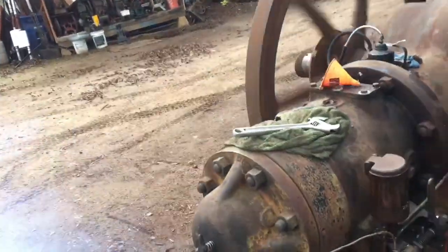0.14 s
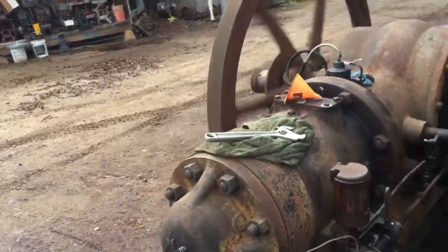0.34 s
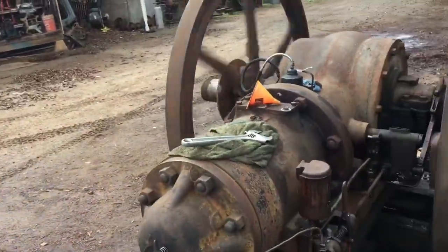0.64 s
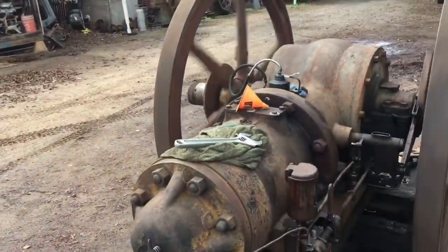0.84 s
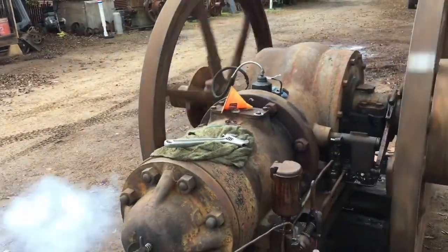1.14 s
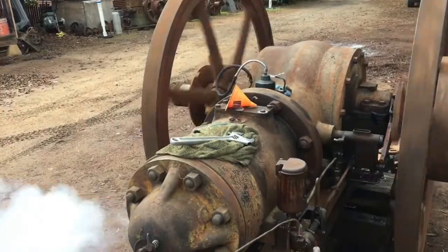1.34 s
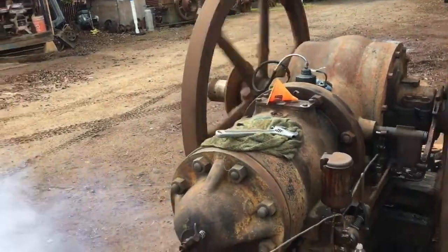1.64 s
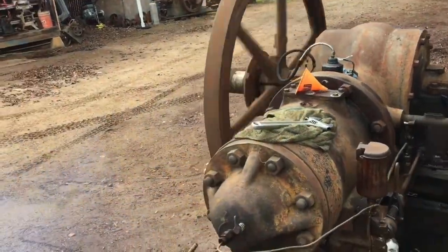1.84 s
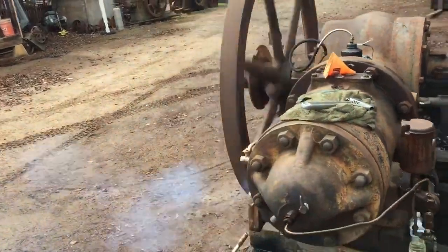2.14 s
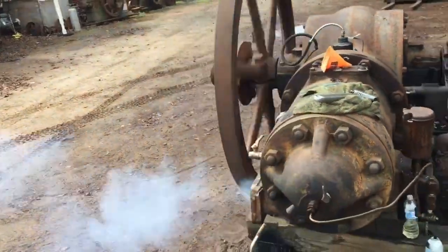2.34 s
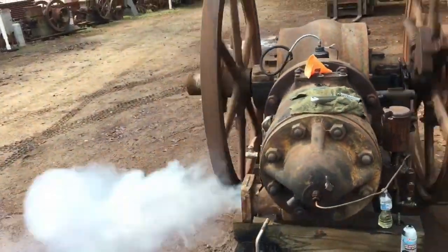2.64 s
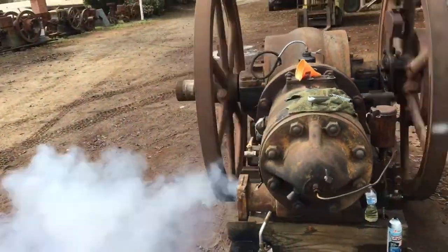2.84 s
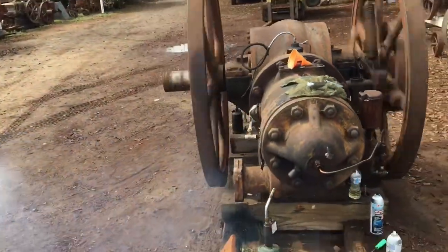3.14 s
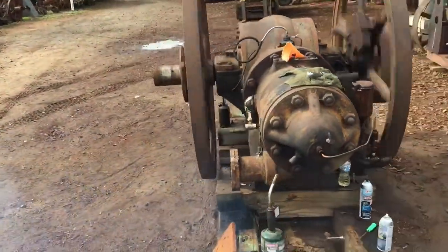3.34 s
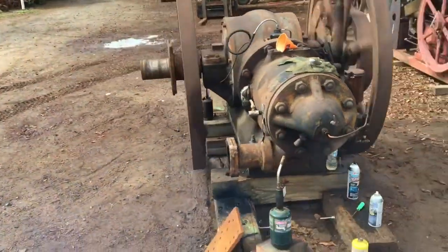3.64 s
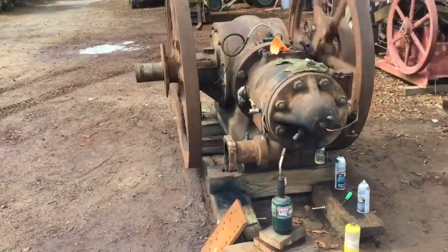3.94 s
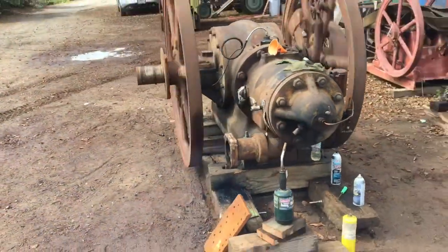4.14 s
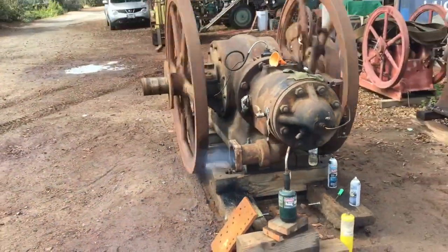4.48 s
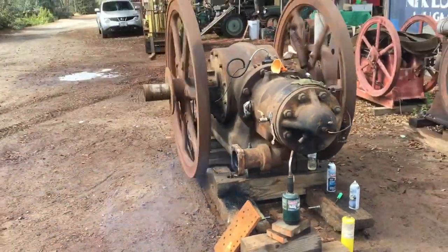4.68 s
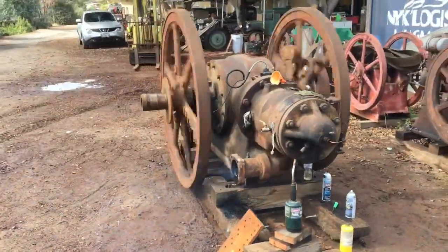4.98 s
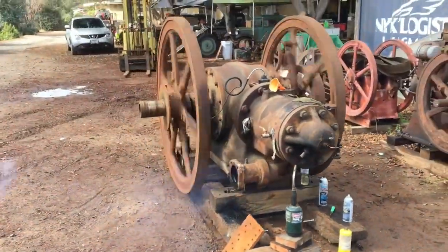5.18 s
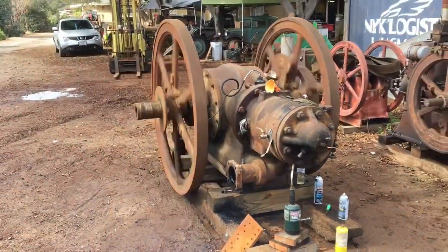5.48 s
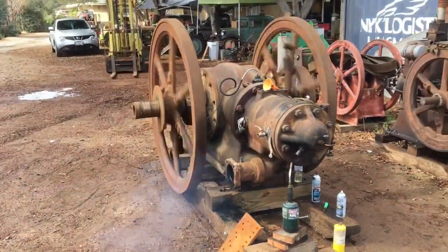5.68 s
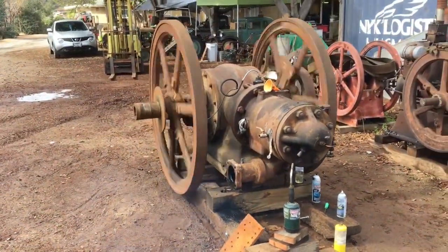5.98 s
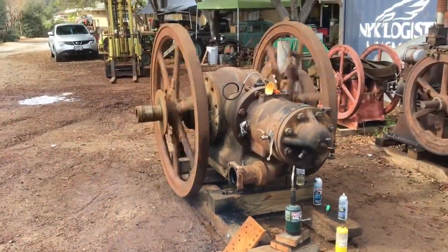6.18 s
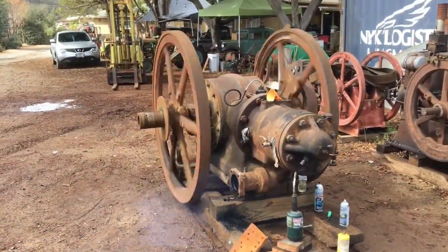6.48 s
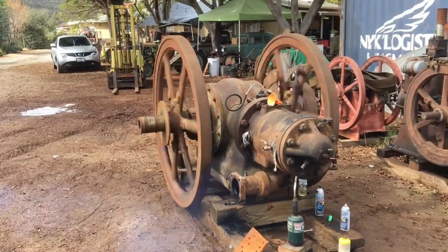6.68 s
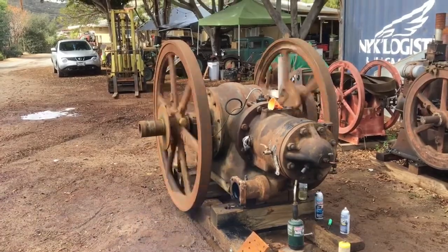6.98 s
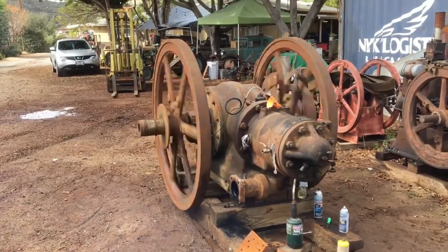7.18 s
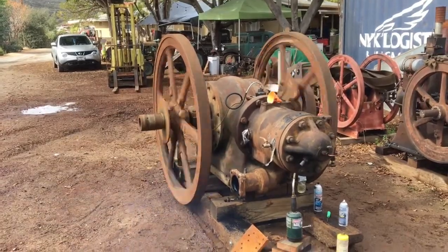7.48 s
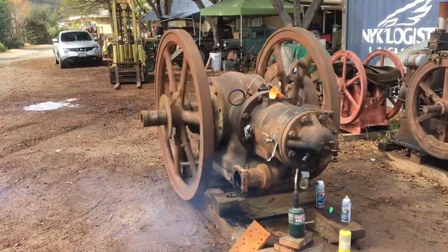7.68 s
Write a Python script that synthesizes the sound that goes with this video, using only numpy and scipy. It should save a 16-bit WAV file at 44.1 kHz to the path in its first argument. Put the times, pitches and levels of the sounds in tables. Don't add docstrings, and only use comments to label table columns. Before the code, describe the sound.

An old heavy flywheel engine runs unevenly in a dirt yard: punchy low thumps with hissing, cracking exhaust jets, then soft breathy misfires and occasional weak spits. Between blows the pipe hoots briefly and air rushes through the body. Small metal clinks and pump ticks sit underneath. The handheld microphone moves from close beside the engine to facing the exhaust, where the jets sound clearer and brighter; a short wall echo fades.

```python
import sys
import numpy as np
from scipy import signal
from scipy.io import wavfile

SR = 44100
rng = np.random.default_rng(int(sys.argv[2]) if len(sys.argv) > 2 else 0)


def inscribe(sig):
    pcm = np.round(np.clip(np.atleast_2d(sig).T, -1, 1) * 32767)
    wavfile.write(sys.argv[1], SR, pcm.astype(np.int16))


def how_loud(loudness_db):
    steps = np.asarray(loudness_db, float) / 20
    return 10 ** steps


N = 344862

# (time [s], thump [dB], jet [dB], pipe ring at shutting [Hz])
FIRED = [(0.011, -8.5, -24.5, 159), (0.1847, -9, -21.5, 149.6), (0.354, -9.5, -21, 151),
         (0.525, -9.5, -26, 146), (0.6953, -10.5, -26.5, 147), (1.3785, -10, -27.5, 140.6),
         (1.55, -7.5, -18.5, 158), (1.8914, -9.5, -23, 154), (2.9298, -6.5, -17, 151),
         (3.1043, -11, -20.5, 154.4), (3.2757, -11, -19.5, 156), (3.447, -12, -21, 159),
         (3.6185, -12, -21.5, 155), (3.7879, -11, -21, 154), (3.9567, -13, -24, 150),
         (4.2962, -11, -21.5, 146), (4.6354, -9.5, -19.5, 143), (4.8057, -12, -31.5, 145),
         (5.1446, -9, -19.5, 148), (5.3155, -11.5, -23.5, 146), (5.656, -8.5, -16.5, 148.5),
         (5.8244, -9.5, -19.5, 150), (5.9934, -10, -20, 150), (6.668, -8.5, -16.5, 153.5),
         (6.8361, -11, -19, 151), (7.004, -10.5, -19, 150), (7.1711, -10.5, -23, 143),
         (7.3369, -11.5, -20, 151.5), (7.668, -10, -19.5, 153.5)]
# (time [s], thump [dB], bark [dB], puff [dB], pipe ring [Hz])
MISSED = [(0.862, -21, -23.5, -52, 142.2), (1.031, -21.5, -27, -55, 135), (1.2057, -20.5, -38, -50, 134.3),
          (2.061, -20, -22, -52.5, 141), (2.233, -19.5, -20, -52, 137.5), (2.4062, -20, -43, -47.5, 132.7),
          (2.583, -20, -43, -46.5, 136.5), (4.1254, -22.5, -22.5, -51.5, 142),
          (4.466, -21.5, -24, -49, 138.5), (4.974, -19.5, -21, -45, 136), (5.4846, -20, -20, -45.5, 133.5),
          (6.3296, -21, -26, -47, 142), (6.497, -18, -20.5, -43.5, 135), (7.501, -23, -34, -48.5, 138)]
# (time [s], thump [dB], bark [dB], puff [dB], pipe ring [Hz])
HALF_BURNT = [
    (1.719, -18, -17, -53, 141),
    (2.754, -12.5, -11.5, -51.5, 130),
    (6.159, -15, -19, -46, 151.4),
]
# (time [s], share facing pipe end [0-1], share behind engine [0-1],
# running noise [dB], fuel pump [dB])
WALK = [(0, 0.15, 0.96, -54, -60), (.8, 0, 0.67, -71, -52.5), (1.3, 0.03, 0.89, -63, -51.5),
        (1.9, 0, 0.57, -60, -52.5), (2.7, 0.12, 0.68, -63, -46.5), (3.2, 0.31, 0, -51, -58),
        (4.2, 1, 0.13, -66, -61.5), (6, 1, 0.13, -59, -54.5), (7.82, 1, 0.3, -88, -61)]
# (time [s], level [dB])
SCAVENGE = [(0, 7.5), (.6, -2.1), (1.4, 5.9), (1.7, 0), (2.8, 5.5), (3.4, 6), (4.2, -0.8), (5.2, 3.1),
            (5.9, 0), (6.5, 3.7), (7.0, -2.2), (7.8, -4)]
# (time [s], level [dB])
INTAKE = [(1.9, -48), (1.958, -54), (2.194, -44.5), (2.534, -32), (2.784, -36.5), (2.904, -35), (3.0, -46)]
# (time [s], level [dB], pitch
# [Hz])
CLINKS = [(0.122, -31.5, 4200), (.298, -44, 4200), (1.488, -31.5, 2300), (1.5, -39, 4300),
          (1.988, -51, 11500), (1.899, -33, 1650), (2.25, -47, 1740), (7.1, -56, 2570), (7.29, -41, 4060),
          (.987, -55, 8600), (1.156, -59, 8560), (1.328, -59, 8700)]

# (centre [Hz], width [Hz], level [dB])
THROAT_SIDE = [(370.5, 58, 0.5), (488.4, 51, 0.5), (571, 420, -4), (897, 98, -5), (1059, 120, 0.5),
               (1290, 94, -28)]
THROAT_END = [(486.5, 45, 0), (669.5, 194, 4.5), (941, 92, 3), (1113, 280, -11.5)]
# (centre [Hz], width [Hz], level [dB])
MOUTH_SIDE = [(1200, 36, 13), (1775, 136, 4), (2526, 500, -2.5), (3834, 84, -6), (4200, 180, -13),
              (5550, 240, -12)]
MOUTH_END = [(1638, 150, 2), (2335, 380, 3), (3546, 1200, -4.5), (4100, 350, -2.5), (6840, 1200, -9)]
# (centre [Hz], width [Hz], level [dB])
PUMP = [(9300, 670, 0), (11500, 340, 5), (12000, 690, 3), (14400, 1100, -16)]
# (frequency [Hz], density [dB per Hz])
BLAST = [(710, -32), (1200, 3), (2020, -21.5), (2320, -7), (3080, -15.5), (3830, 7.5), (4500, -4.5),
         (6720, 5.5), (7660, -12), (9310, 0.5), (10600, -5.5), (14700, -1.5), (16000, -19)]
PUFF = [(710, -35), (1200, -4), (1810, 1.5), (2130, -5.5), (2380, -2), (2590, -1.5), (5020, -6.5),
        (5780, -8), (8000, -12.5), (11800, -8), (16000, -29)]
# (frequency [Hz], t60 [s])
BLAST_T60 = [(1200, 0.077), (3000, 0.14), (7000, 0.037), (15000, 0.042)]
YARD_T60 = [(1200, 1), (4000, 0.55), (15000, 0.076)]
# (frequency [Hz], level [dB], t60 [s])
FLAP = [(497, 10.5, 0.071), (969, 7.5, 0.052), (1076, 4, 0.063)]
IRON = [(1157, 6, 0.058), (1290, -14, 0.042), (1710, 1, 0.037), (2450, 4, 0.057), (2684, 2, 0.021),
        (3560, 2, 0.021), (4200, 2, 0.046), (5510, 0, 0.013), (7180, 0, 0.025)]
CLACK = [(479, -2, 0.075), (712.6, 3, 0.081), (972, 6, 0.03)]

# (at 145 Hz ring [dB], slope [dB per Hz of ring], after a miss [dB],
# from behind [dB], share of scavenge swing [dB per dB])
RING_RULE = (-23.5, -0.14, 1.5, -1.5, 0.54)
CLACK_RULE = (-33.5, -0.2, -2.6, 0.7, 0.74)
RETURN_RULE = (-41.5, -0.11, 1.5, 6, 0.7)
RETURN_JET_RULE = (-57, -0.2, -5, 11.5, 0.7)

OPEN_FIRED_S, OPEN_MISSED_S = 0.0628, 0.0638
BARK_DB, BARK_PER_THUMP = -11.5, 0.61
THROAT_DB, THROAT_PER_THUMP, THROAT_PER_JET = -19.5, 1.12, 0.37
MISS_THROAT_DB, HALF_THROAT_DB = -17.5, -19
BRIGHT_DB, BRIGHT_BEHIND_DB = -6, -4.5
ECHO_S, ECHO_DB, ECHO_BEHIND_DB, ECHO_BARK_DB = 0.046, -27, 17.5, -12
SWELL_BEHIND_S = 0.02
CRACK_DB, CRACK_T60_S, HALF_PUFF_DB = 5.5, 0.031, 5.5
IRON_PITCH_SPREAD = 0.043
BARK_HZ, BARK_SAG_HZ_PER_S = 169.3, 1320


def rms_one(x):
    return x / np.sqrt(np.mean(x ** 2) + 1e-20)


def at_hz(points, hz):
    table_hz, values = np.array(points).T
    return np.interp(np.log(hz), np.log(table_hz), values)


def at_s(rows, s, column):
    rows = np.array(rows)
    return np.interp(s, rows[:, 0], rows[:, column])


def add(out, s, wave):
    i = int(round(s * SR))
    wave = wave[max(-i, 0):max(N - i, 0)]
    out[max(i, 0):max(i, 0) + len(wave)] += wave


def gusts(times_s, levels_db, rise, hold, t60):
    u = np.arange(int((hold + t60) * SR)) / SR
    shape = (1 - np.exp(-(u / rise) ** 2)) * how_loud(-120 * np.maximum(u - hold, 0) / t60)
    out = np.zeros(N)
    for s, db in zip(times_s, levels_db):
        add(out, s, how_loud(2 * db) * shape)
    return out


def flutter(rate_hz, depth_db):
    r = np.exp(-2 * np.pi * rate_hz / SR)
    slow = signal.lfilter([1], [1, -2 * r, r * r], rng.standard_normal(N + 9000))[9000:]
    return how_loud(depth_db * rms_one(slow))


def resonant(modes, twice=False):
    white, out = rng.standard_normal(N), 0
    for k, (hz, width_hz, db) in enumerate(modes):
        r = np.exp(-np.pi * width_hz / SR)
        section = [1 - r, 0, r - 1, 1, -2 * r * np.cos(2 * np.pi * hz / SR), r * r]
        out = out + (-1) ** k * how_loud(db) * signal.sosfilt([section] * (1 + twice), white)
    return rms_one(out)


def facing_mix(facing, end, side):
    return np.sqrt(facing) * resonant(end, twice=True) + np.sqrt(1 - facing) * resonant(side, twice=True)


def strike(times_s, levels_db, modes, spread_db, spread_hz=0.006):
    out, u = np.zeros(N), np.arange(int(0.1 * SR)) / SR
    for s, db in zip(times_s, levels_db):
        for hz, mode_db, t60 in modes:
            hz = hz * (1 + spread_hz * rng.standard_normal())
            blow_db = db + mode_db + spread_db * rng.standard_normal()
            onset = 1 - np.exp(-u * hz / 5.2)
            add(out, s, how_loud(blow_db - 60 * u / t60) * np.sin(2 * np.pi * hz * u) * onset)
    return out


def openings():
    s, thump_db, jet_db, _ = np.transpose(FIRED)
    force_db = thump_db + 10.5
    bark_db = BARK_DB + BARK_PER_THUMP * force_db
    throat_db = THROAT_DB + THROAT_PER_THUMP * force_db + THROAT_PER_JET * (jet_db + 21)
    bright_db = BRIGHT_DB + BRIGHT_BEHIND_DB * at_s(WALK, s, column=2)
    fired = np.array([s, thump_db, bark_db, throat_db, jet_db, bright_db])
    s, thump_db, bark_db, puff_db, _ = np.transpose(MISSED + HALF_BURNT)
    rush_db = np.repeat([MISS_THROAT_DB, HALF_THROAT_DB], [len(MISSED), len(HALF_BURNT)])
    return fired, np.array([s, thump_db, bark_db, thump_db + rush_db, puff_db])


def shuttings():
    turns = [(r[0], r[-1], 0) for r in FIRED] + [(r[0], r[-1], 1) for r in MISSED + HALF_BURNT]
    s, hz, missed = np.transpose(sorted(turns))
    s = s + np.where(missed, OPEN_MISSED_S, OPEN_FIRED_S)
    behind, scavenge_db = at_s(WALK, s, column=2), at_s(SCAVENGE, s, column=1)
    causes = np.array([np.ones(len(s)), hz - 145, missed, behind, scavenge_db])
    rules = np.array([RING_RULE, CLACK_RULE, RETURN_RULE, RETURN_JET_RULE])
    ring_db, throat_db, return_db, jet_db = rules @ causes
    return np.array([s, ring_db, hz, throat_db, return_db, jet_db])


def rumble():
    shake = how_loud(-36) * resonant([(68, 68, -0.6), (139, 85, -1.8)], twice=True)
    return signal.sosfilt(signal.butter(2, 42, "high", fs=SR, output="sos"), shake)


def clinks():
    out = np.zeros(N)
    for s, db, hz in CLINKS:
        width_hz = 450 if hz < 6000 else 160
        power = gusts([s], [db - 3.5], rise=0.0015, hold=0.012, t60=0.05)
        out += np.sqrt(power) * flutter(250, depth_db=3) * resonant([(hz, width_hz, 0)], twice=True)
    return out


def intake():
    s, db = np.transpose(INTAKE)
    shut_s = shuttings()[0]
    stroke = gusts(shut_s + 0.035, 0 * shut_s, rise=0.02, hold=0.07, t60=0.15) + 0.08
    level = how_loud(np.interp(np.arange(N) / SR, s, db, left=-70, right=-70))
    return level * np.sqrt(stroke) * resonant([(377, 70, -1.1), (425, 90, -0.41)], twice=True)


def pump(pump_db):
    shut_s = shuttings()[0]
    level_db = np.interp(shut_s, np.arange(N) / SR, pump_db)
    uneven_db = 3 * rng.standard_normal((len(shut_s), 2))
    tick = gusts(shut_s + 0.0325, level_db + 3 + uneven_db[:, 0], rise=0.0005, hold=0.002, t60=0.03)
    drop = gusts(shut_s + 0.0686, level_db - 0.5 + uneven_db[:, 1], rise=0.0024, hold=0.016, t60=0.061)
    out = np.sqrt(tick) * (resonant(PUMP) + how_loud(-5) * resonant([(6000, 7000, 0)]))
    return out + np.sqrt(drop) * resonant([(4900, 2700, 1), (11000, 4900, -2.0)])


def throat(facing):
    (fired, missed), shut = openings(), shuttings()
    power = gusts(fired[0] - 0.011, fired[3] - 12, rise=0.0034, hold=0.01, t60=0.046)
    power += gusts(fired[0], fired[3] + 0.5, rise=0.0011, hold=0.0032, t60=0.069)
    power += gusts(fired[0] + 0.0071, fired[3] - 11, rise=0.013, hold=0.0055, t60=0.24)
    power += gusts(missed[0] - 0.005, missed[3], rise=0.0061, hold=0.051, t60=0.11)
    power += gusts(shut[0] - 0.012, shut[3] - 5, rise=0.003, hold=0.012, t60=0.05)
    power += gusts(shut[0] + 0.031, shut[4] + 0.26, rise=0.023, hold=0.013, t60=0.18)
    mouth = facing_mix(facing, THROAT_END, THROAT_SIDE) + how_loud(-14.5) * resonant([(850, 900, 0)])
    rush = np.sqrt(power + how_loud(-104)) * flutter(37, depth_db=2.5) * mouth

    facing_shut = facing[(shut[0] * SR).astype(int)]
    clack_db = shut[3] + 7 + 10 * np.log10(0.1 + facing_shut)
    flap_db = shut[4] + 2.5 + 10 * np.log10(0.2 + facing_shut)
    blows = strike(shut[0] - 0.009, clack_db, CLACK, spread_db=1.5)
    blows += strike(shut[0] + 0.043, flap_db, FLAP, spread_db=2.0)

    case = gusts(shut[0] + 0.046, shut[4] + 4, rise=0.011, hold=0.028, t60=0.37)
    case += how_loud(8.5) * power + how_loud(-71.5)
    dull = resonant([(187.5, 31, -0.5), (246, 71, -13.0)])
    return rush + blows + np.sqrt(case) * how_loud(-3 * facing) * flutter(23.5, depth_db=3.0) * dull


def band_share(table, mids_hz):
    power = how_loud(2 * at_hz(table, mids_hz)) * mids_hz
    return power / np.sum(power)


def jet(facing, echo_db, running_db):
    (fired, missed), shut = openings(), shuttings()
    half = np.transpose(HALF_BURNT)
    puff = gusts(missed[0] + 0.0055, missed[4] + 1.2, rise=0.011, hold=0.029, t60=0.17)
    puff += gusts(half[0] + 0.0018, half[3] + HALF_PUFF_DB, rise=0.0022, hold=0.0083, t60=0.08)
    soft = gusts(shut[0] + 0.03, shut[5], rise=0.0036, hold=0.059, t60=0.026)
    soft += gusts(fired[0] - 0.01, fired[4] - 22, rise=0.0085, hold=0.011, t60=0.02)
    soft += how_loud(2 * running_db)
    echo_db = echo_db[(fired[0] * SR).astype(int)]

    edges_hz = np.geomspace(1200, 17000, 12)
    mids_hz = np.sqrt(edges_hz[1:] * edges_hz[:-1])
    white, out = rng.standard_normal((2, N)), 0
    shares = zip(mids_hz, band_share(BLAST, mids_hz), band_share(PUFF, mids_hz))
    for k, (hz, blast_share, puff_share) in enumerate(shares):
        bandpass = signal.butter(2, edges_hz[k:k + 2], "band", fs=SR, output="sos")
        band = rms_one(signal.sosfilt(bandpass, white[k % 2]))
        level_db = fired[4] + (fired[5] + 3) * np.clip(np.log2(hz / 3500), 0, 1)
        blast = gusts(fired[0] + 0.0019, level_db + 1.4, rise=0.0045, hold=0.0034, t60=at_hz(BLAST_T60, hz))
        blast += gusts(fired[0] + 0.00059, level_db - 18, rise=0.0045, hold=0.0007, t60=at_hz(YARD_T60, hz))
        blast += gusts(fired[0] + ECHO_S, level_db + echo_db, rise=0.0051, hold=0.023, t60=0.14)
        crack = gusts(fired[0] + 0.0018, level_db + CRACK_DB, rise=0.0012, hold=0.0039, t60=CRACK_T60_S)
        beam = how_loud(-24 * (1 - facing) * (hz > 4800))
        gentle = np.sqrt(beam) * soft + 0.6 * beam * puff
        power = blast_share * blast + puff_share * gentle
        out = out + np.sqrt(power) * flutter(30, depth_db=1.8) * band
        out = out + np.sqrt(blast_share * crack) * band[::-1]

    sing = gusts(fired[0] + 0.002, fired[4] - 6, rise=0.002, hold=0.005, t60=0.09)
    sing += how_loud(-3) * soft + how_loud(3) * puff
    sing += gusts(fired[0] + 0.0011, fired[4] - 19, rise=0.0027, hold=0.0014, t60=0.3)
    out += np.sqrt(sing) * facing_mix(facing, MOUTH_END, MOUTH_SIDE)
    out += strike(fired[0] + 0.003, fired[4] - 3.5, IRON, spread_db=3.5, spread_hz=IRON_PITCH_SPREAD)
    return out * flutter(150, depth_db=2.2)


def thump(u, hz, peak, width):
    return np.exp(-((u - peak) / width) ** 2) * np.sin(2 * np.pi * hz * u)


def pipe_tones(swell_s):
    out, u = np.zeros(N), np.arange(int(0.12 * SR)) / SR
    swing = thump(u, hz=68, peak=0.023, width=0.0122)
    bark = -np.sin(2 * np.pi * (BARK_HZ - BARK_SAG_HZ_PER_S * u / 2) * u)
    bark *= (1 - np.exp(-u / 0.001)) * np.exp(-(u / 0.0155) ** 2)
    pop = np.sin(2 * np.pi * 330 * u) * np.exp(-u / 0.004)
    for s, thump_db, bark_db, *_ in [*openings()[0].T, *HALF_BURNT]:
        add(out, s - 0.001, how_loud(thump_db + 4.3) * swing)
        add(out, s + 0.0022, how_loud(bark_db + 7) * bark)
        add(out, s + ECHO_S - 0.004, how_loud(bark_db + ECHO_BARK_DB) * bark)
        add(out, s + 0.00033, how_loud(bark_db - 0.5) * pop)

    suck = -thump(u, hz=64, peak=0.024, width=0.015)
    cold_bark = -np.sin(2 * np.pi * 160 * u) * (1 - np.exp(-u / 0.0045)) * np.exp(-(u / 0.0083) ** 2)
    for s, thump_db, bark_db, *_ in MISSED:
        add(out, s - 0.0005, how_loud(thump_db + 6) * suck)
        add(out, s + 0.0049, how_loud(bark_db + 11.5) * cold_bark)

    for s, ring_db, hz, *_ in shuttings().T:
        rise = 0.0013 + np.clip((hz - 140) / 10, 0, 1) * swell_s[int(s * SR)]
        onset = 1 - np.exp(-u / rise)
        late = np.maximum(u - rise, 0)
        fade = 1.016 * np.exp(-(late / (4.92 / hz * 140 / hz)) ** 2) + 0.13 * np.exp(-late / 0.04)
        fronts = -np.sin(6 * np.pi * hz * u) * onset * np.exp(-u / 0.012)
        add(out, s - 0.77 / hz, how_loud(ring_db - 9) * fronts)
        add(out, s - 0.701 / hz, how_loud(ring_db + 8.5) * np.sin(2 * np.pi * hz * u) * onset * fade)
    return out


def scene():
    s, *columns = np.transpose(WALK)
    facing, behind, running_db, pump_db = [np.interp(np.arange(N) / SR, s, c) for c in columns]
    facing, behind = np.clip(facing, 0, 1), np.maximum(behind, 0)
    echo_db = ECHO_DB + ECHO_BEHIND_DB * behind
    swell_s = SWELL_BEHIND_S * behind ** 2
    mix = rumble() + clinks() + intake() + pump(pump_db)
    mix += throat(facing) + jet(facing, echo_db, running_db) + pipe_tones(swell_s)
    return mix[None]


def band_limit(x):
    return signal.sosfilt(signal.butter(12, 16800, fs=SR, output="sos"), x)


def record(dry):
    x = dry / (1 + (np.abs(dry) / 0.74) ** 5) ** 0.2
    x = 0.6 * x + 0.4 * signal.lfilter(*signal.iirnotch(10300, 9, fs=SR), x)
    x = signal.sosfilt(signal.cheby2(10, 60, 16864, fs=SR, output="sos"), x)
    return band_limit(x)


dry = scene()
out = record(dry)
inscribe(out)
```